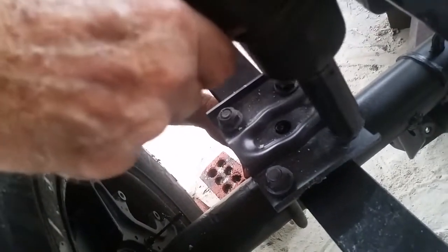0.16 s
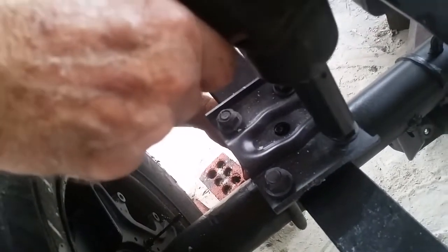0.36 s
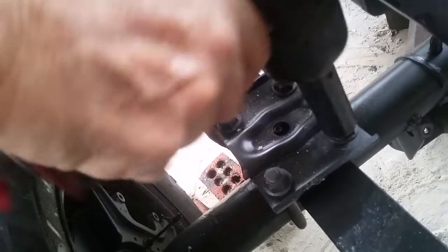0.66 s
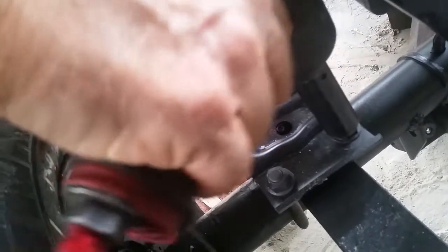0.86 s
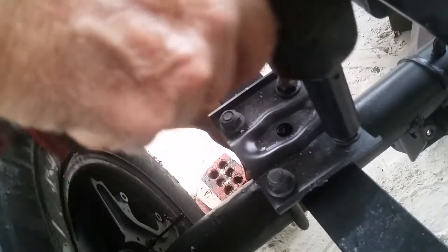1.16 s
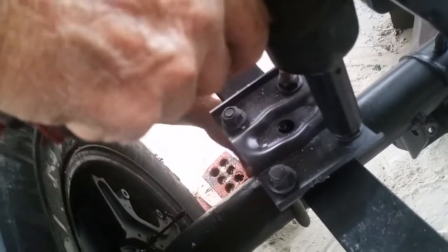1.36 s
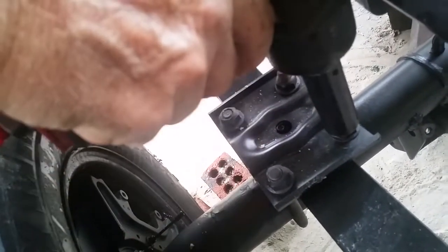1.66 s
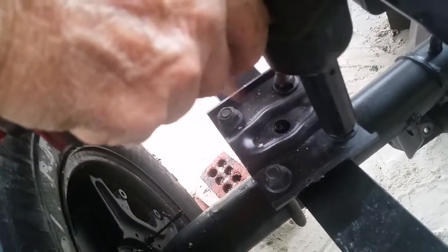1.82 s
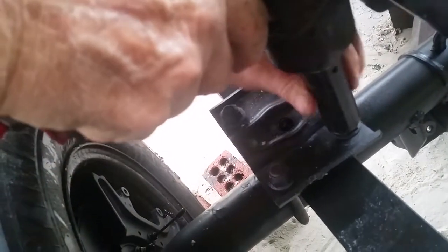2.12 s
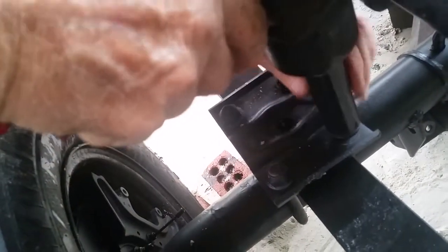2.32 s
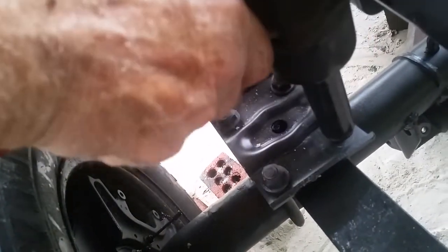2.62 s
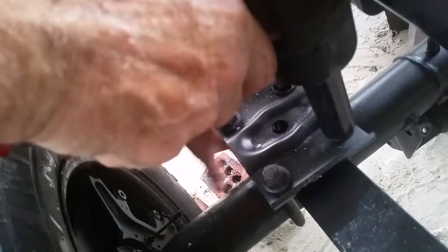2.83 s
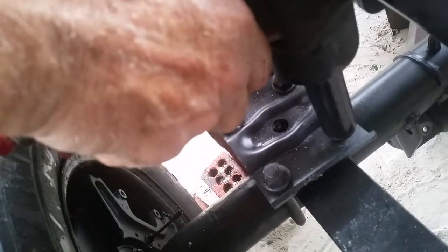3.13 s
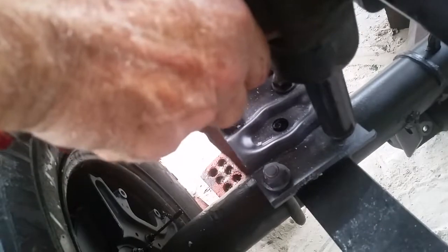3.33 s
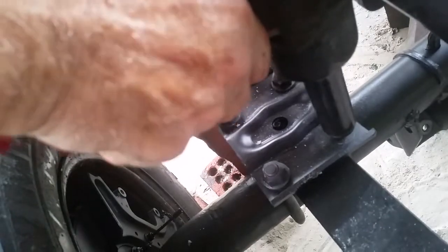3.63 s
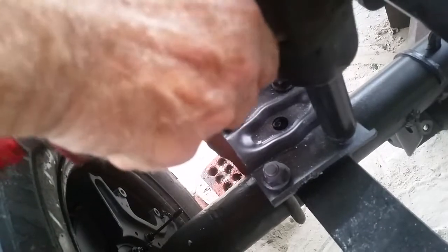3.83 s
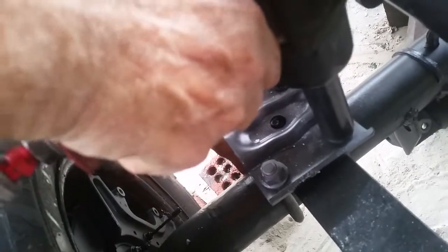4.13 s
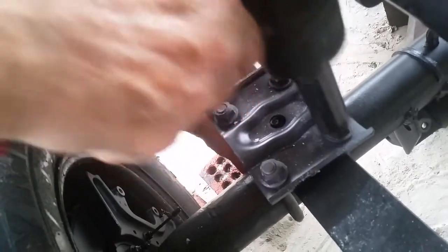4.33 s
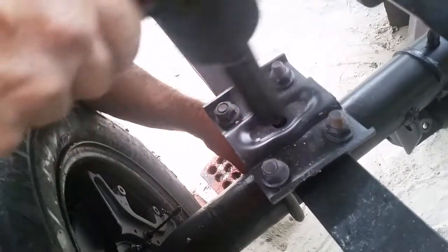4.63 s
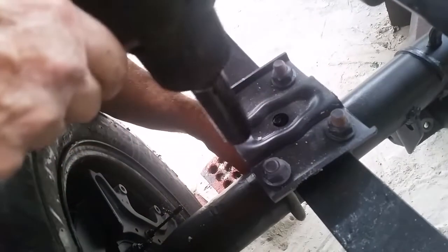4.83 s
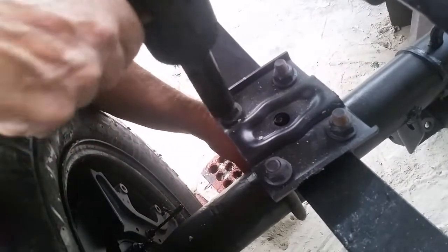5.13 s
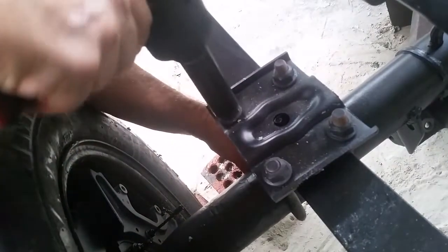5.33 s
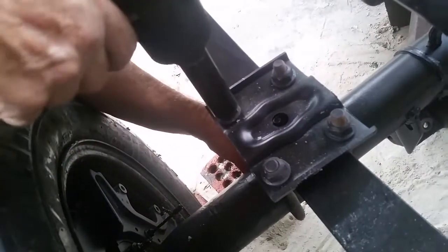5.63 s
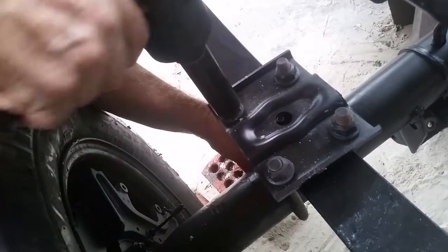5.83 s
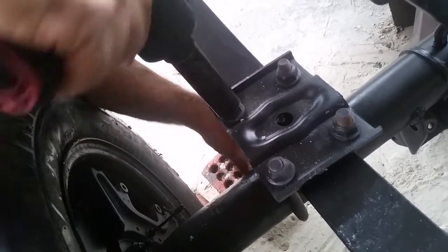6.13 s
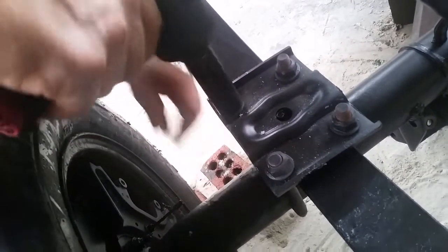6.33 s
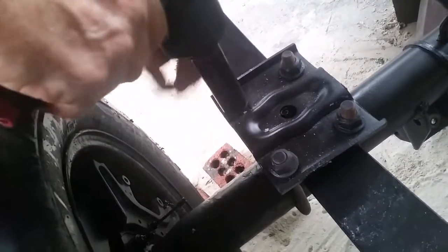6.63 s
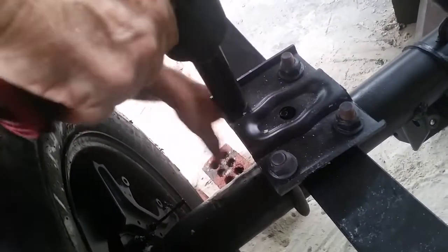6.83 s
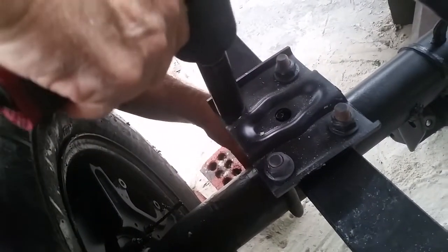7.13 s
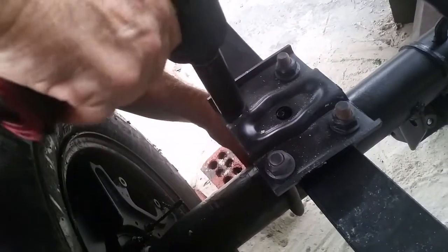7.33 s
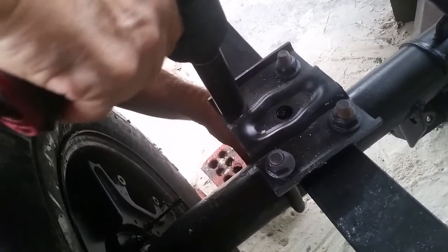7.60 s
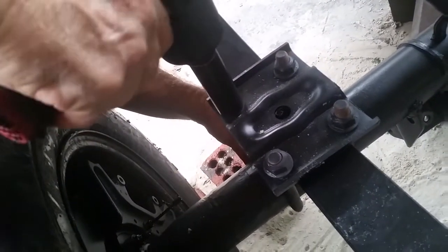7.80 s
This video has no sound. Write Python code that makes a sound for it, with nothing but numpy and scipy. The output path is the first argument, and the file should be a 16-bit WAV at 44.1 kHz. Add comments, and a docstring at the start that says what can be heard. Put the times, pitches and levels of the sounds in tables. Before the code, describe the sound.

Very close in a workshop, an air wrench starts almost quiet with faint ticks, then a bright whistling air hiss swells and holds. A sharp metal knock rings out around two seconds. Two short bursts of rattling impact hammering follow near four seconds. The hiss drops, wavers and grows again with clinks and dull bumps, then two more bursts end in a faint leak. Short echoes surround the blows.

```python
"""Air wrench on an axle plate, close to a phone in a workshop

With the trigger eased, air hisses and whistles through the exhaust port (shaped noise) over a low hum (a sine).
Four squeezes spin the vane motor, a train of puffs in harmonics, and its hammer rattles the socket: bursts of
uneven rebounds that excite steel modes, with low thumps (wavering sines) under some of the blows.
Before and between runs the socket knocks on the ringing plate and the tool bumps and shifts in the hand.
The workshop answers with echoes."""
import sys
import numpy as np
from scipy import signal
from scipy.fft import rfft, irfft
from scipy.io import wavfile

SR = 44100
rng = np.random.default_rng(int(sys.argv[2]) if len(sys.argv) > 2 else 0)


def dump_mix(stems):
    """Bounce the given channels to the path in sys.argv[1] as a 16-bit WAV at rate SR."""
    frames = np.atleast_2d(stems).T  # one column per channel
    limited = np.clip(frames, -1, 1)  # hard clip at full scale
    pcm = np.round(limited * 32767).astype(np.int16)
    wavfile.write(sys.argv[1], SR, pcm)


N = 351036
TIME = np.arange(N) / SR  # s

# Hammer blows. Each row: start in seconds, relative level in dB, treble against that level in dB.
BLOWS = [(3.683, -12.5, -10), (3.708, -11.5, -7), (3.733, -17, -10), (3.758, -13, -3.5), (3.789, -16, -9),
         (3.803, -13.5, -4), (3.835, -18.5, -18), (3.855, -12.5, -5), (3.875, -19, -19), (3.906, -19.5, -5),
         (3.966, -20.5, -8), (4.022, -17.5, -14), (4.045, -13, -6.5), (4.072, -14, -18.5),
         (4.09, -15.5, -3.5), (4.113, -17, -4), (4.131, -12, -6.5), (4.17, -15.5, -3), (4.184, -13.5, -5),
         (4.212, -13.5, -5), (4.231, -13, -6), (4.257, -19.5, -6), (4.291, -16.5, -5.5), (4.328, -26.5, -5),
         (4.409, -27.5, 0.5), (6.907, -14.5, -12), (6.921, -17, 1.5), (6.943, -15, 0.5),
         (6.977, -19.5, -17.5), (6.991, -13, -3.5), (7.023, -16, -16), (7.041, -15.5, -2),
         (7.058, -22.5, -8), (7.089, -19, -1), (7.134, -27.5, -17), (7.224, -28, -10), (7.411, -25.5, -4.5),
         (7.44, -15, -3.5), (7.463, -19.5, -2), (7.482, -16, -4), (7.497, -18, -4), (7.51, -17.5, -6),
         (7.527, -16.5, -4), (7.558, -15, -2.5), (7.575, -19, -4), (7.591, -16.5, -1), (7.616, -24.5, -4),
         (7.65, -20, -2.5)]
# Low rumble of flowing air and of a shifting grip. Each row: frequency in Hz, relative level in dB.
RUMBLE = [(25, -20.5), (55, -7), (90, -4), (140, -3), (200, 0), (250, 0), (330, -15), (500, -10),
          (1000, -22)]
# Bright tick of steel on steel. Each row: frequency in Hz, relative level in dB.
TICK = [(4000, -36), (7500, -12), (10500, 13.5), (13000, 4.5), (15500, 6.5)]
# Slow ring of the axle and spring. Each row: frequency in Hz, width in Hz, relative level in dB.
AXLE_MODES = [(198, 14, 1), (240, 14, -3), (552, 6, -8), (625, 18, -10), (787, 20, -11), (1100, 40, -8),
              (1570, 35, -12), (2160, 30, -11), (2680, 20, -12)]


def undb(db):
    """Decibels to gain."""
    return 10 ** (np.asarray(db) / 20)


def unit(x):
    """Scale to rms 1."""
    return x / np.sqrt(np.mean(x ** 2))


def noise():
    """White noise as long as the scene."""
    return rng.standard_normal(N)


def walk(rate):
    """Random wander with a spread near 1: straight lines between `rate` random points a second."""
    points = rng.standard_normal(8192)
    return 1.2 * np.interp(TIME * rate, np.arange(8192), points)


def bell(s, width):
    """A smooth rise and fall around a moment."""
    return np.exp(-.5 * ((TIME - s) / width) ** 2)


def convolve(x, response):
    """Pass a sound through a response scaled to unit energy."""
    return signal.fftconvolve(x, response / np.sqrt(np.sum(response ** 2)))[:N]


def colour(x, points, size=4096):
    """Causal minimum-phase filter through (Hz, dB) points, falling away below the lowest."""
    hz, db = np.transpose(points)
    grid = np.maximum(np.arange(size // 2 + 1) * SR / size, 1)
    below = np.minimum(grid / hz[0], 1) ** 2
    gain = undb(np.interp(np.log(grid), np.log(hz), db)) * np.maximum(below, 1e-3)
    # folding the cepstrum onto positive time makes the response causal
    cepstrum = irfft(np.log(gain))
    cepstrum[1:size // 2] *= 2
    cepstrum[size // 2 + 1:] = 0
    return convolve(x, irfft(np.exp(rfft(cepstrum))))


def ring(x, modes):
    """Drive damped modes (Hz, width Hz, dB): the wider a mode, the faster it dies."""
    t = TIME[:SR // 2]
    response = np.zeros(len(t))
    for hz, width, db in modes:
        decay = width * np.exp(-np.pi * width * t)
        response += undb(db) * decay * np.cos(2 * np.pi * hz * t)
    return convolve(x, response)


def chatter(events, fall_s, grain_db, bite, strike):
    """Steel on steel: one clean strike, a few ms of uneven rebounds, a quick fall; gives force and treble share."""
    force, bright = np.zeros((2, N))
    t = TIME[:SR // 16]
    for start, db, treble_db, length in events:
        # the rebounds change strength every 16 samples
        rebounds = np.repeat(undb(grain_db * rng.standard_normal(len(t))), 16)[:len(t)]
        fall = np.exp(-np.maximum(t - length, 0) / fall_s)
        onset = 1 + bite * np.exp(-t / 0.00043)
        burst = rng.standard_normal(len(t)) * rebounds * fall * onset
        burst[0] = strike * np.sqrt(np.sum(burst ** 2))
        # the energy is that of the given level held for the length of the chatter
        burst *= undb(db) * np.sqrt(abs(length) * SR / np.sum(burst ** 2))
        i = int(start * SR)
        force[i:i + len(t)] += burst
        bright[i:i + len(t)] += burst * undb(treble_db)
    return force, bright


def flow():
    """Control levels of jet and port whistle in dB: the bleed while the trigger is eased, else a steady leak."""
    # Air through the eased trigger, one curve before each pair of squeezes.
    # Each row of a curve: time in seconds, jet control level in dB, port whistle against the jet in dB.
    bleeds = [
        [(0.25, -59, -7), (0.27, -49.5, -8), (0.73, -29.5, -6.5), (0.76, -29.5, -8), (0.8, -27.5, -4),
         (1.07, -23, -1.5), (1.11, -23.5, -8), (1.14, -25, -4), (1.76, -24.5, -5.5), (2.67, -26.5, -4.5),
         (3.59, -25.5, -3), (3.62, -25, -4.5)],
        [(4.5, -39.5, -5.5), (5.12, -44, -2.5), (5.36, -37, -11), (5.56, -29, -2.5), (5.78, -25, -8),
         (5.87, -30.5, -5.5), (5.97, -27, -1.5), (6.0, -27, -7), (6.09, -29.5, 1.5), (6.36, -25.5, -9),
         (6.52, -29, -5), (6.84, -26.5, -9.5)],
    ]
    leak_db, leak_port_db = -45.5, -6  # jet, and whistle against it, with the trigger shut
    jet_db, port_db = leak_db, leak_port_db
    for bleed in bleeds:
        s, db, whistle_db = np.transpose(bleed)
        away = np.abs(TIME - np.clip(TIME, s[0], s[-1]))  # s outside the curve
        # the bleed dies as the motor takes the air: its dB above the leak shrink to a tenth in about 0.2 s
        eased = 10 ** (-4.9 * away)
        jet_db = jet_db + eased * np.maximum(np.interp(TIME, s, db) - leak_db, 0)
        port_db = port_db + eased * (np.interp(TIME, s, whistle_db) - leak_port_db)
    return jet_db, jet_db + port_db


def deflected(width_hz):
    """A band of hiss that swells and slides down as the hand nears the jet, and back up as it leaves."""
    # The hand bends the hiss. Each row: nearest moment in seconds, approach in seconds, retreat in seconds,
    # lowest centre in Hz, level against the jet in dB.
    hand_passes = [(.99, .11, 0.028, 11300, 1.5), (1.158, 0.027, 0.043, 9400, -3),
                   (5.77, .05, 0.044, 11830, -7), (6.11, .085, 0.18, 8040, -1.5)]
    free_hz = 15020  # centre with the hand away
    hz, gain = free_hz, 0
    for s, approach, retreat, lowest_hz, db in hand_passes:
        near = bell(s, np.where(TIME < s, approach, retreat))
        hz = hz - (free_hz - lowest_hz) * near
        gain = gain + undb(db) * np.sqrt(near)
    lowpass = signal.butter(4, width_hz / 2, fs=SR, output="sos")
    band = unit(signal.sosfilt(lowpass, noise()))
    wavering_hz = hz * (1 + 0.0072 * walk(60))
    # the carrier lifts the low band of noise up to the moving centre
    carrier = np.cos(2 * np.pi * np.cumsum(wavering_hz) / SR)
    return gain * band * carrier


def air():
    """A turbulent jet, the port's whistle, the rush inside the housing, a rumble and a hum, all following the flow."""
    # Spectrum of the free jet. Each row: frequency in Hz, relative level in dB.
    jet_spectrum = [(4700, -36), (6500, -4.5), (8800, -7), (9800, -4), (11400, 0.5), (12700, 8),
                    (13800, 2.5), (15500, 5.5), (16500, -17)]
    # Rush inside the housing. Each row: frequency in Hz, relative level in dB.
    housing_spectrum = [(300, -8), (900, -8), (1300, -3), (1700, -2), (2000, -6.5), (2350, 3.5), (2700, -2),
                        (3300, 6), (3750, -1), (4100, 3), (4600, -1.5), (6000, -18.5), (9000, -10.5)]
    # Larger eddies of a strong flow. Each row: frequency in Hz, relative level in dB.
    eddy_spectrum = [(2500, -25), (4300, -11), (5600, 3), (7000, 2), (10000, -8.5)]
    # Resonances of the exhaust port. Each row: frequency in Hz, width in Hz, relative level in dB.
    port_modes = [(7480, 480, 3), (8010, 660, 6)]
    turn_s, turned_db = 4.9, -1  # the wrench moves to the next nut and its housing faces away

    jet_db, port_db = flow()
    opening_db = jet_db + 26.5  # against a trigger eased well open
    flutter_db = 0.81 * walk(40) + .5 * walk(300)
    jet = undb(jet_db - 0.34) * colour(noise(), jet_spectrum)

    whistle = ring(ring(noise(), port_modes), [(8030, 3470, 0)])
    highpass = signal.butter(4, 5600, "high", fs=SR, output="sos")
    port = undb(port_db - 5.5 + 0.25 * walk(25)) * signal.sosfilt(highpass, whistle)

    # the valve sings in one narrow band even at a trickle; the rest of the housing needs a real flow
    valve_band = ring(ring(noise(), [(3210, 1200, 0)]), [(3130, 1100, 0)])
    valve = undb(-59 + 0.73 * opening_db) * valve_band
    housing_db = -41.5 + 1.47 * opening_db + turned_db * (TIME > turn_s)
    housing = undb(housing_db) * colour(noise(), housing_spectrum)

    # a strong flow tears into larger eddies, which fill in the middle
    eddies = undb(1.766 * jet_db + 5.0) * colour(noise(), eddy_spectrum)
    bent = undb(jet_db) * deflected(width_hz=1800)
    rumble = undb(-54 + 1.09 * opening_db + 2.0 * walk(32)) * colour(noise(), RUMBLE)
    hum = undb(jet_db - 29.5 + 0.86 * walk(0.47)) * np.sin(2 * np.pi * 53.6 * TIME)
    hiss = jet + port + valve + housing + eddies + bent
    return undb(flutter_db) * hiss + rumble + hum


def knocks():
    """The socket meets the plate, which rings lower and duller than the hammer."""
    # Socket and tool on the plate. Each row: start in seconds, relative level in dB,
    # treble against that level in dB, length of the chatter in seconds.
    contacts = [(.104, -53, -1, 0.022), (.149, -54.5, -6, 0.0056), (.348, -46, 5.5, 0.0095),
                (.464, -54, -16, 0.0093), (.484, -43.5, -10, 0.01), (1.142, -39.5, -16, 0.018),
                (2.197, -31, -20, 0.0071), (2.215, -15.5, -8.5, 0.0044), (2.267, -41, -15, .002),
                (2.512, -38, -18, 0.0046), (3.631, -26, -11, 0.0033), (3.653, -31, -24, 0.015),
                (4.418, -38, -6, 0.026), (5.221, -50.5, 4.5, 0.026), (6.377, -35, -14, 0.012),
                (6.394, -20, -27.5, 0.004), (6.815, -30, -17, 0.0089), (7.342, -40.5, -14, 0.0028),
                (7.718, -38, -14, 0.0042)]
    # Broad voice of the plate. Each row: frequency in Hz, relative level in dB.
    plate_spectrum = [(80, -9), (250, -12.5), (400, -4.5), (700, -2), (1050, -4.5), (1350, -5.5), (1800, 2),
                      (2300, -2.5), (3000, 0), (4000, -10.5), (5500, -13), (7000, -9), (12000, -21)]
    # Resonances of the plate. Each row: frequency in Hz, width in Hz, relative level in dB.
    plate_modes = [(1120, 230, 8.5), (1380, 100, -16), (1890, 90, -18), (2760, 140, 2.5),
                   (3250, 110, -14.5), (3660, 71, 3.5), (4540, 300, -0.5), (5370, 120, -23),
                   (5480, 150, -3.5)]
    force, bright = chatter(contacts, fall_s=.004, grain_db=2.5, bite=0.22, strike=0.6)
    body = colour(force, plate_spectrum)
    plate_ring = undb(-3.5) * ring(force, plate_modes)
    tick = undb(6.0) * colour(bright, TICK)
    axle_ring = undb(-29) * ring(force, AXLE_MODES)
    return body + plate_ring + tick + axle_ring


def grips():
    """The hand shifts on the tool: swells of low rumbling noise."""
    # Shifts of the grip. Each row: middle in seconds, level in dB, time either side in seconds.
    shifts = [(.58, -53, 0.29), (1.16, -47.5, 0.04), (2.36, -49.5, 0.18), (5.55, -56, 0.18),
              (6.0, -48, 0.16), (6.5, -40.5, 0.13)]
    swell = sum(undb(db) * bell(s, span) for s, db, span in shifts)
    return swell * colour(noise(), RUMBLE)


def bumps():
    """Padded contacts: a dull scuff of noise that dies quickly."""
    # Soft bumps of hand and tool body. Each row: start in seconds, relative level in dB, decay in seconds.
    soft_contacts = [(0.49, -51, 0.016), (1.153, -41.5, 0.031), (2.227, -38, 0.027), (3.373, -48, 0.025),
                     (5.381, -54, 0.054), (5.619, -37, 0.012), (6.404, -33.5, 0.012), (6.502, -46, 0.01)]
    # Dull voice of a padded contact. Each row: frequency in Hz, relative level in dB.
    dull_spectrum = [(80, -4.5), (200, -11.5), (350, -7.5), (600, -1.5), (1000, -9), (1500, -17),
                     (4000, -44)]
    push = np.zeros(N)
    for s, db, length in soft_contacts:
        push += undb(db) * (TIME > s) * np.exp(-np.abs(TIME - s) / length)
    return undb(3.5) * colour(push * noise(), dull_spectrum)


def rotor():
    """Vane rate, air drive and sag: the rotor gathers speed, loses some to each blow and runs down on release."""
    # Squeezes of the trigger. Each row: pressed in seconds, released in seconds, first vane rate in Hz,
    # top vane rate in Hz (both before any sag), relative motor level in dB, opening surge in dB.
    squeezes = [(3.677, 3.799, 169.5, 339, -27, 6.5), (4.015, 4.18, 174.5, 355, -26.5, -3.5),
                (6.863, 6.982, 170.6, 344.5, -22.5, 0.5), (7.397, 7.568, 183.7, 284.8, -26, -10)]
    attack_s, surge_s = .004, .02  # the valve opens; the first rush of air settles
    coast_s, release_db_per_s = 0.09, 305.5  # after release the rotor runs down and the puffs fade
    sag_hz, sag_lag_s, sag_width_s = 71.77, 0.007, .03  # speed lost to a full blow, when lowest, how long
    full_blow_db, slowest_hz = -14.5, 108.2

    hz, drive, sag = np.zeros((3, N))
    for pressed, released, first_hz, top_hz, db, surge_db in squeezes:
        since = np.maximum(TIME - pressed, 0)
        after = np.maximum(TIME - released, 0)
        spin_up = np.interp(TIME, [pressed, released], [first_hz, top_hz])
        hz += (since > 0) * spin_up * np.exp(-(after / coast_s) ** 2)
        surge = surge_db * np.exp(-since / surge_s)
        fade = release_db_per_s * np.minimum(after, 1)
        drive += np.minimum(since / attack_s, 1) * undb(db + surge - fade)

    check = np.interp(TIME[:SR // 16], [0, sag_lag_s, sag_width_s], [0, sag_hz, 0])
    for s, db, _ in BLOWS:
        i = int(s * SR)
        # the cube means that lighter blows hardly check the rotor
        sag[i:i + len(check)] += check * min(undb(db - full_blow_db) ** 3, 1)
    return np.maximum(hz - sag, slowest_hz), drive, sag


def motor():
    """Each vane lets out a puff: pressure builds, then collapses. The rate sags whenever the hammer catches."""
    # Overtones of the puffs at 300 vanes a second. Each row: multiple of the vane rate, relative level in dB.
    overtones = [(1, 1.5), (2, 0.5), (3, -1.5), (4, -8), (5, -24), (6, -21.5), (7, -18.5)]
    # Roar of the exhaust. Each row: frequency in Hz, relative level in dB.
    exhaust_spectrum = [(100, -10.5), (400, 5.5), (1200, 2), (2400, -4), (4500, -5.5), (6200, -11),
                        (7700, 2.5), (9500, -6.5), (12800, -3), (15500, -1.5)]
    hz, drive, sag = rotor()
    speed = hz / 300
    # a labouring rotor turns unevenly, a fast one runs true
    wobble = .047 * walk(330) / speed ** 2
    phase = 2 * np.pi * np.cumsum(hz) / SR + wobble
    # faster vanes open the port more abruptly, which strengthens the overtones up to that rate
    growth = 2.6 * np.minimum(speed - 1, 0)
    saw = np.zeros(N)
    for multiple, db in overtones:
        saw -= undb(db) * multiple ** growth * np.sin(multiple * phase)
    # puffs scatter in strength, and a checked rotor lets out weaker ones: 0.09 dB for each Hz lost
    puffs = saw * undb(1.3 * walk(260) - 0.09 * sag)
    # the exhaust roars more as the motor gathers speed, most at each puff
    pulsed = noise() * (1 + .5 * np.cos(phase))
    exhaust = colour(pulsed, exhaust_spectrum) * speed ** 0.43
    exhaust_gain = undb(-19.5) * (drive / undb(-23.5)) ** 0.82
    return drive * undb(3.5) * puffs + exhaust_gain * exhaust


def hammer():
    """Blows, each with one bounce, crack through anvil, socket and nut and set the axle ringing."""
    # Crack of a blow. Each row: frequency in Hz, relative level in dB.
    crack_spectrum = [(100, -5.5), (400, -7.5), (800, -4), (1250, -3.5), (1600, -2.5), (2350, 2),
                      (3100, 0.5), (4200, -6), (5600, -2), (8000, -1.5), (10000, -21), (15000, -14)]
    # Resonances of hammer, socket and nut. Each row: frequency in Hz, width in Hz, relative level in dB.
    steel_modes = [(1190, 50, 0.5), (1310, 50, 0.5), (1710, 81, -2), (2010, 130, -3.5), (2254, 97, -1.5),
                   (2660, 74, -20), (2945, 88, -0.5), (4000, 80, -14.5), (5280, 70, -6), (5450, 70, -17.5),
                   (5700, 35, -28), (6640, 70, -20.5), (7020, 220, -5.5), (7500, 620, -8.5),
                   (10500, 120, -0.5)]
    chatter_s, bounce_chatter_s = 0.0052, .004  # how long the faces rattle
    bounce_s, bounce_db, bounce_treble_db = .0075, -7, 3  # the glancing bounce is later, lighter, brighter
    strikes, bounces = [], []
    for s, db, treble_db in BLOWS:
        strikes.append((s, db, treble_db, chatter_s))
        bounces.append((s + bounce_s, db + bounce_db, treble_db + bounce_treble_db, bounce_chatter_s))
    force, bright = chatter(strikes + bounces, fall_s=.0018, grain_db=5, bite=.8, strike=0.2)
    crack = undb(-2.0) * colour(force, crack_spectrum)
    steel_ring = undb(-8.0) * ring(force, steel_modes)
    tick = undb(1.0) * colour(bright, TICK)
    axle_ring = undb(-14.5) * ring(force, AXLE_MODES)
    return crack + steel_ring + tick + axle_ring


def thumps():
    """Low thumps under some of the hammer blows, of unsteady pitch: a wavering sine in short swells."""
    # Thumps under the blows. Each row: middle in seconds, relative level in dB.
    low_thumps = [(3.696, -42), (3.8, -39), (3.86, -45), (4.048, -16), (4.094, -28.5), (4.125, -33),
                  (6.886, -36), (6.945, -24.5), (7.044, -26), (7.421, -25)]
    swell = sum(undb(db) * bell(s, 0.0062) for s, db in low_thumps)
    hz = 78 * np.exp(.42 * walk(120))
    tone = np.sin(2 * np.pi * np.cumsum(hz) / SR)
    return undb(2.0) * swell * tone


def workshop(x, t60_low, t60_high, treble_db):
    """Dense echoes from the underbody and floor, duller as they fade."""
    t = TIME[:SR]
    lowpass = signal.butter(2, 3000, fs=SR, output="sos")
    low, bright = rng.standard_normal((2, SR))
    low_tail = signal.sosfilt(lowpass, low) * undb(-60 * t / t60_low)
    bright_tail = undb(treble_db) * bright * undb(-60 * t / t60_high)
    build_up = 1 - np.exp(-t / 0.0025)
    return convolve(x, (low_tail + bright_tail) * build_up)


def scene():
    """Wrench and plate at arm's length, in mono; the exhaust points at the microphone, so it stays nearly dry."""
    exhaust, blows, plate = motor(), hammer(), knocks() + bumps()
    sent = undb(-26) * exhaust + undb(-12.0) * blows + undb(-8.5) * plate
    room = workshop(sent, t60_low=0.53, t60_high=0.33, treble_db=3.5)
    mono = air() + exhaust + blows + plate + thumps() + grips() + room
    return np.array([mono, mono])


def record(dry):
    """The phone thins the deepest bass, rounds the loudest peaks and cuts the top."""
    bass_cut = signal.butter(2, 32, "high", fs=SR, output="sos")
    top_cut = signal.ellip(12, .2, 80, 15760, fs=SR, output="sos")
    thinned = signal.sosfilt(bass_cut, dry)
    rounded = np.tanh(1.18 * thinned) / 1.186
    return signal.sosfilt(top_cut, rounded)


dry = scene()
out = record(dry)
dump_mix(out)
```